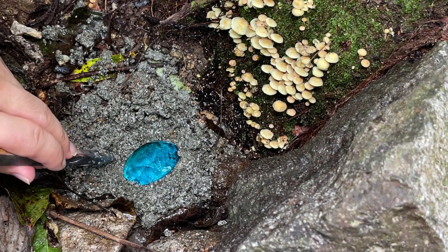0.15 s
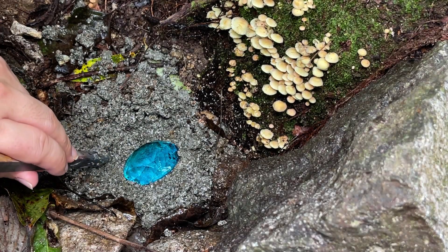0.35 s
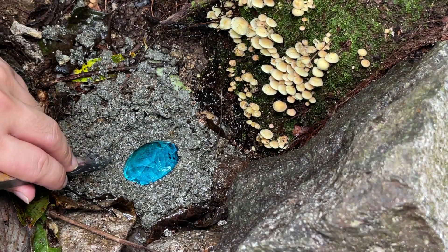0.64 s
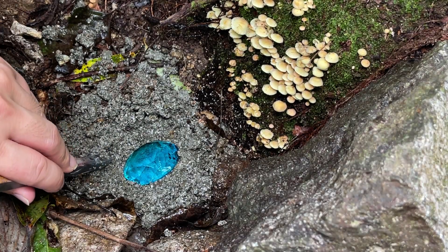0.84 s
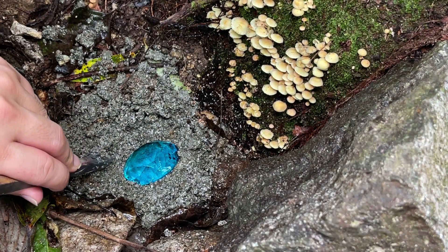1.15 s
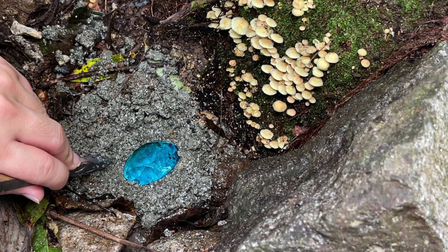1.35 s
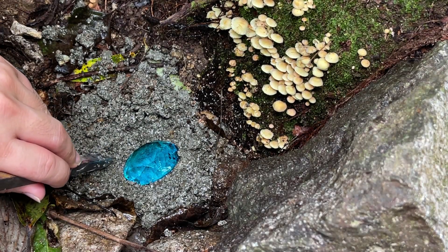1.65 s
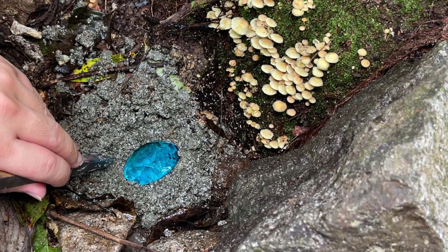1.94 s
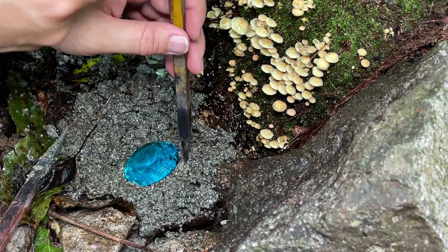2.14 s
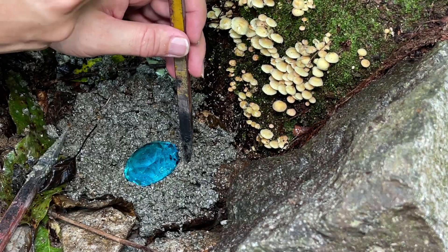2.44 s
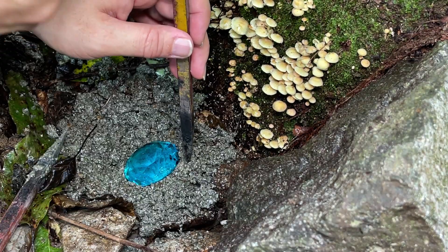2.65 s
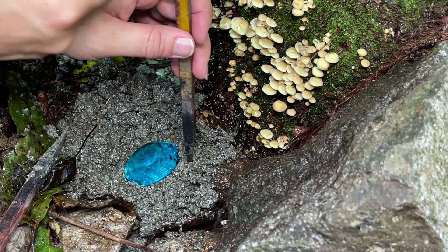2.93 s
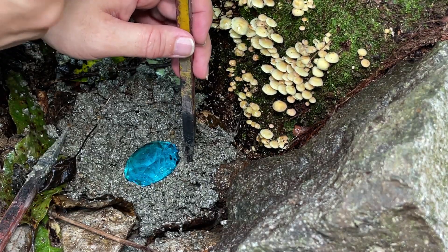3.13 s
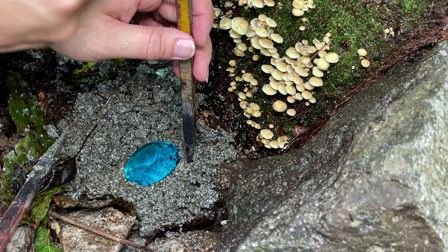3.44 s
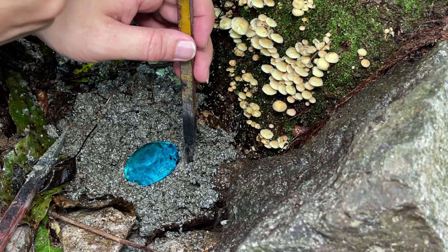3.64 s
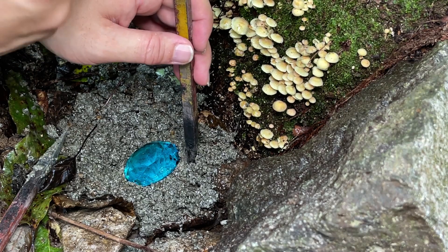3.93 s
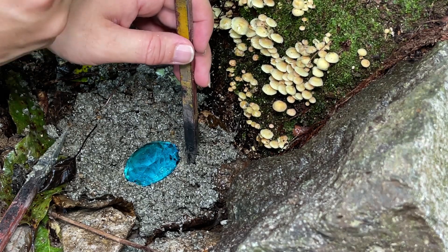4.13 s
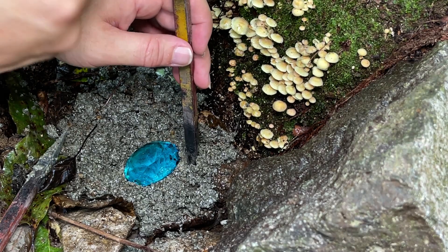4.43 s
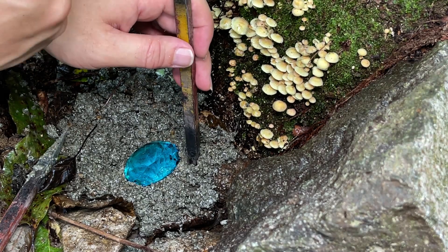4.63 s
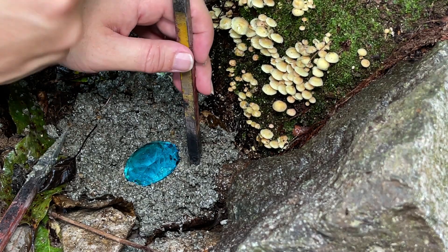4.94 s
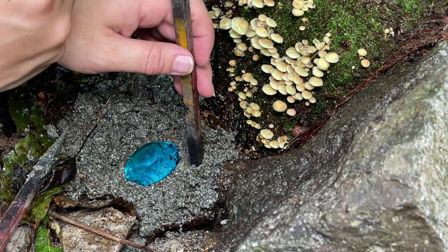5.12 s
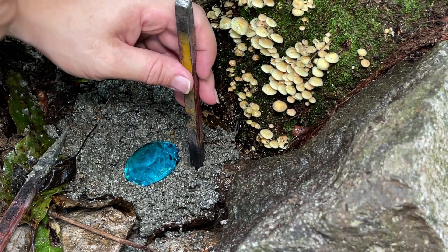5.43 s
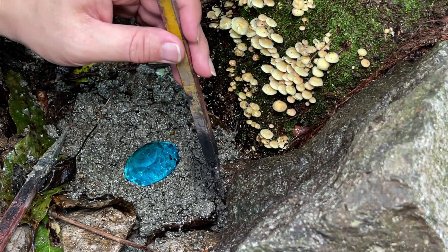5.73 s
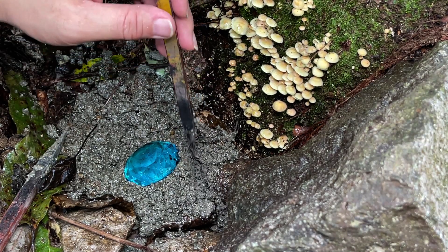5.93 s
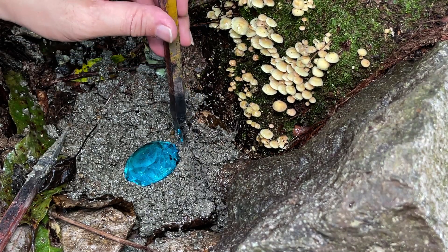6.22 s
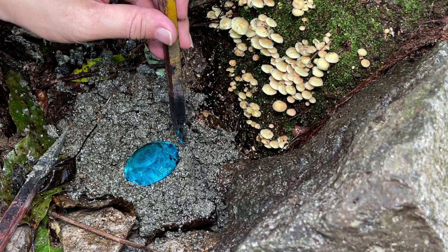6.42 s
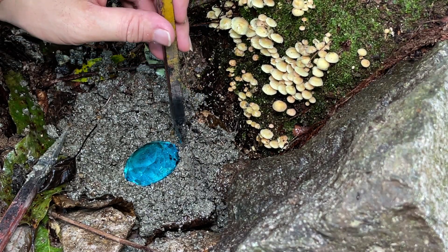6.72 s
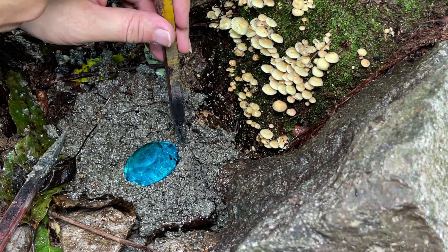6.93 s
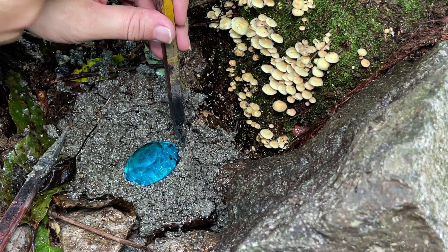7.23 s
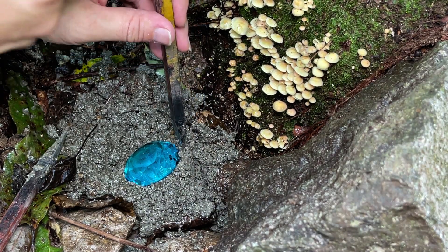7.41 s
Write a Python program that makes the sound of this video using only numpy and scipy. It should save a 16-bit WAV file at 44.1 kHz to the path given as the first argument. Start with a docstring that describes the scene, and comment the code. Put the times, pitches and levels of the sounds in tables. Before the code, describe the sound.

A steel pick chips crumbly rock close to a hand-held microphone, over a faint, steady hiss of far cicadas and forest air. A small bird chirps faintly at the start and near 1.6 seconds. From 1 second come five lighter taps, about four a second, each a sharp crack with a short clink, crushed grit and a slight thud. At 2.1 seconds the sound drops out for an instant. From 2.2 to 5.3 seconds the pick strikes harder at the same pace, with small rebounds, a little sliding grit and a faint echo from the trees. Near 2.8 seconds a bird whistles thinly and a distant dove starts cooing, both very quiet. From 5.5 to 6.5 seconds the tip scrapes softly over grit. A shrill insect, heard faintly at first, returns around 6.2 seconds. One soft tap at 7 seconds and two hard blows finish.

```python
"""Forest floor, hand-held microphone close to a steel pick chipping crumbly rock; cicadas far off throughout.
A small bird chirps, then the slanted pick strikes: each blow cracks, rings in the hand-damped steel,
crushes grit and thuds into the ground, and the trees answer faintly. At 2.1 s the sound drops out briefly.
The pick goes on upright and harder while a bird whistles and a far dove starts to coo. From 5.5 s the tip
drags over grit, a nearer insect swells for the second time, and three last blows fall."""
import sys
import numpy as np
from scipy import signal
from scipy.fft import rfft, irfft, next_fast_len
from scipy.io import wavfile
from scipy.ndimage import map_coordinates

SR = 44100
rng = np.random.default_rng(int(sys.argv[2]) if len(sys.argv) > 2 else 0)


def file_out(sig):
    """Save sig as 16-bit WAV at sys.argv[1]."""
    # one column per channel
    cols = np.atleast_2d(sig).T
    # limit, then scale
    lim = np.clip(cols, -1, 1)
    pcm = np.round(lim * 32767).astype(np.int16)
    wavfile.write(sys.argv[1], SR, pcm)


N = 333837
TIME = np.arange(N) / SR
BLOW_SAMPLES, CUTOFF_HZ = 8192, 16200
DROPOUT_S = (2.1005, 2.205)   # the pick is slanted before it, upright after

# Table levels are relative; a row's t is its start.
# blows, close up: t/s, strength/dB, grain sharpness/dB, ring of upper modes/dB, clink of main mode/dB
BLOWS = [(1.0114, 1, -2.5, 7.5, 11.5), (1.2527, 5.5, -6, 5, -3.5), (1.4848, 3.5, -3.5, 5.5, -8),
         (1.721, 3, 3, -0.5, -7.5), (1.9383, 5, -4, 4, -2.5), (2.2438, 14, -0.5, 0.5, -8),
         (2.511, 13, 1, 6.5, -2.5), (2.7904, 12.5, -2, 10.5, -3), (3.039, 2, -7, 2, -18.5),
         (3.2947, 15, -0.5, 3, -11), (3.5577, 14.5, -2.5, 6.5, -7), (3.8126, 12.5, -5, -2, -16),
         (4.0813, 19.5, 4, 3.5, -9), (4.3229, 20.5, 0, 1, -9.5), (4.5731, 21, 4, 1, -5.5),
         (4.8322, 21, -1.8, -0.5, -8), (5.0862, 15, -3, 1.5, 3.5), (5.3198, 15.5, -7.5, 5.5, 1.5),
         (7.011, -10, -10.5, 5.5, 3.5), (7.2478, 15, -1.5, 4.5, 2.5), (7.5271, 18.5, 2.5, -2, -10)]
# the tip falls back on the rock: t/s, strength/dB
REBOUNDS = [(1.2612, -10), (1.9436, -5.5), (2.2573, -4.5), (2.5328, -8.5), (2.7964, 0), (3.8187, 0.5),
            (4.0953, 4), (4.3313, -3), (4.5863, -2), (4.8431, 4), (7.2627, -11.5), (7.5393, -14)]
# crack of steel on rock in each grip: f/Hz, level/dB
CRACK_SLANTED = [(40, -30.5), (120, -8), (240, -20), (420, -5.5), (700, -8), (1500, -6.5), (2200, 4),
                 (3000, 2.5), (4500, -12), (6000, -15.5), (7500, -23), (10000, -20.5), (13000, -29.5),
                 (16000, -43)]
CRACK_UPRIGHT = [(40, -17.5), (120, -10), (240, -14.5), (390, -2), (620, -4.5), (1100, -3), (1700, 0.5),
                 (2800, -1), (4400, -13.5), (5500, -10), (7500, -24.5), (10000, -20), (13000, -32.5),
                 (16000, -39)]
TOP_SLANTED_HZ, TOP_UPRIGHT_HZ = 13300, 13620   # a high, clear ring of the steel
# resonances of pick and rock, negative where they cancel: f/Hz, width/Hz, gain/dB
MODES_SLANTED = [(370, 72, 2.4), (975, 61, -14), (1170, 160, 7.1), (1420, 140, -24.5), (2252, 340, 2.1),
                 (2510, 110, -18), (2400, 76, 0.93), (2400, 120, -16), (3300, 90, -16.5),
                 (4900, 250, -11.5), (4600, 250, 6.9), (4300, 160, -4.5), (5780, 147, 12), (6100, 90, 11.6),
                 (9500, 250, 7.5), (9700, 130, 9.3), (TOP_SLANTED_HZ, 45, 13)]
MODES_UPRIGHT = [(820, 210, -16), (1650, 120, 1), (2110, 260, 4.3), (2325, 200, -16.5), (2540, 190, 3),
                 (3170, 120, -8.5), (3343, 190, 4.95), (7000, 170, 2.2), (6200, 120, 2.8), (6340, 83, 10),
                 (6620, 110, 12), (11000, 230, 1.3), (10200, 130, 5.5), (TOP_UPRIGHT_HZ, 45, 18),
                 (14830, 65, 13)]
# main ring of the steel: f/Hz, level/dB, t60/s, lingering trace/dB
PING_SLANTED, PING_UPRIGHT = (3160, -33, 0.0356, -51.5), (3490, -25, 0.0161, -68)
# grit crushed under the tip: level/dB, t60/s
GRIT_SLANTED, GRIT_UPRIGHT = (-4, 0.025), (-7.5, .018)
# loose grit slides back into the hole: t/s, level/dB
SLIDES = [(4.75, -33.5), (5.005, -37)]
# spectra of sliding grit, tumbling crumbs, hollow ground and echo off the trees: f/Hz, level/dB
SLIDING_GRIT = [(500, -18.5), (1400, -3), (2500, -2), (3500, -7), (6000, -31.5)]
CRUMBS = [(40, -5), (90, 1.5), (170, 1.5), (250, -5), (400, 0), (650, 2), (850, -4.5), (1200, -3.5),
          (3000, -6), (6000, -17.5), (14000, -29)]
GROUND_BOOM = [(40, -10.5), (70, -3.5), (100, 3.5), (135, -9), (220, -3.5), (290, -22), (500, -24.5),
               (900, -35), (2000, -57.5)]
TREE_ECHO = [(200, -22.5), (800, -15), (1400, -7), (2300, 1.5), (3600, 1.5), (4200, -9.5), (6300, -7),
             (8000, -21), (10500, -14.5), (13000, -25), (16000, -27.5)]
# the tip drags over grit: t/s, length/s, ping f/Hz, level/dB
DRAGS = [(0.167, 0.025, 3200, -63.5), (5.5, 0.11, 3450, -74), (5.596, 0.12, 3340, -69.5),
         (5.752, 0.054, 2880, -76), (6.422, 0.066, 3450, -84), (6.495, .008, 3500, -83)]
# upper modes of the dragged tip: f/Hz, width/Hz, gain/dB
TIP_MODES = [(6550, 210, 17.5), (10250, 190, 13.5), (13500, 190, 10), (14900, 120, 12)]
# a small bird's chirps, another's thin rising whistle: t/s, length/s, start f/Hz, end f/Hz, level/dB
CHIRPS = [(.165, 0.051, 5000, 4300, -74), (1.58, .06, 7350, 6700, -68), (1.62, .07, 5470, 4980, -79.5)]
WHISTLE = [(2.8, 0.26, 4590, 4860, -81)]
# phrases of the far dove: t/s
COO_STARTS = [2.76, 4.6, 6.51]
# its three falling notes: delay/s, length/s, start f/Hz, end f/Hz, level/dB
COO_NOTES = [(0, .19, 476.3, 472, -80.5), (.52, .2, 402.5, 407, -81.5), (1.0, .32, 388, 381, -82.5)]
# bouts of the nearer insect: t/s, end/s, level/dB
SHRILL_BOUTS = [(-.5, 2.1, -76.5), (6.2, 7.6, -78.5)]
# its partials: multiple of the main pitch, level/dB
SHRILL_PARTIALS = [(.955, -7), (1, 2), (1.035, -9), (1.08, -2), (1.116, -11), (1.165, -8)]
# far chorus of cicadas: f/Hz, level/dB
CICADAS = [(3500, -35.5), (4450, -20.5), (5000, -28.5), (5200, -16.5), (5400, -2), (6050, 0), (6550, -5.5),
           (7000, -12.5), (7400, -23.5), (8400, -17.5), (9400, -22), (10200, -33)]
# forest air during each grip: f/Hz, level/dB
AIR_SLANTED = [(60, -0.5), (150, 4), (400, 3), (1000, -1.5), (3200, -2.5), (4000, -11), (9000, -5.5),
               (11000, -13.5), (15500, -20.5)]
AIR_UPRIGHT = [(60, 9), (150, 3), (300, 1), (600, -0.5), (1200, -6), (2500, -10), (4000, -10.5),
               (9000, -10.5), (11000, -15.5), (15500, -16.5)]
# handling rumble on the microphone: t/s, level/dB
HANDLING = [(0, -77.5), (1.3, -78.5), (4.3, -75), (6.0, -75), (6.9, -82.5), (7.57, -77)]
# its spectrum: f/Hz, level/dB
RUMBLE = [(20, -0.5), (45, -7), (80, -14.5), (130, -28.5), (300, -49.5)]


def pick(carry_db=4, rebound_clink_db=-3):
    """Close up: blows, duller rebounds, loose grit and the boom of the ground; the trees echo behind."""
    direct, outward, crumble, slide = np.zeros((4, N))
    for s, db, sharp_db, ring_db, clink_db in BLOWS:
        slanted = s < DROPOUT_S[0]
        # a light blow stays in the soft crust; a harder or clinking one has reached firm rock
        soft_db = 3.5 - 0.39 * db - 0.0945 * clink_db
        crumble_db = -12.5 + 0.3227 * db - 0.3245 * clink_db
        grit_db, grit_t60 = GRIT_SLANTED if slanted else GRIT_UPRIGHT
        add(direct, s, from_db(db) * strike(s, soft_db, sharp_db, ring_db, grit_db, grit_t60))
        add(direct, s, clink(s, db + clink_db))
        add(outward, s, from_db([db + (carry_db if slanted else 0)]))   # the slanted pick carries further
        add(crumble, s, from_db([crumble_db]))
    for s, db in REBOUNDS:
        tap = strike(s, soft_db=2.5, sharp_db=-8, ring_db=-5.5, grit_db=-2.5, grit_t60=0.024)
        add(direct, s, from_db(db) * tap)
        add(direct, s, clink(s, db + rebound_clink_db))
    for s, db in SLIDES:
        add(slide, s, from_db([db]))
    crumbs = from_db(-11.5) * scatter(crumble, CRUMBS, t60=.045, rise_s=0.001)
    ground = from_db(-22) * scatter(crumble, GROUND_BOOM, t60=0.42, rise_s=0.0058)
    trees = from_db(-46.5) * scatter(outward, TREE_ECHO, t60=0.4, rise_s=0.06)
    return direct + crumbs + ground + trees + scatter(slide, SLIDING_GRIT, t60=0.24, rise_s=.05)


def strike(s, soft_db, sharp_db, ring_db, grit_db, grit_t60, vary_db=0.47, soft_hz=1000, sharp_hz=4000):
    """One contact: an impulse, splinters and crushed grit, through the resonances of pick and rock."""
    hz = np.fft.rfftfreq(BLOW_SAMPLES, 1 / SR)
    crack, modes = (CRACK_SLANTED, MODES_SLANTED) if s < DROPOUT_S[0] else (CRACK_UPRIGHT, MODES_UPRIGHT)
    grit, splinters = fractures(grit_t60)
    bass = 1 / (1 + (hz / soft_hz) ** 4)
    treble = 1 - 1 / (1 + (hz / sharp_hz) ** 6)
    # in the treble the contact breaks up into many tiny fractures
    broken = from_db(15) * treble * hz / CUTOFF_HZ
    force = (1 + broken * splinters) / np.sqrt(1 + broken ** 2) + from_db(grit_db) * grit
    # a soft spot adds body, a hard grain adds edge
    colour_db = db_at(crack, hz) + soft_db * bass + sharp_db * treble
    # a loose hand lets the sharp modes sing
    centre, width, db = np.transpose(modes)
    mode_db = db + vary_db * rng.standard_normal(len(db)) + ring_db * np.clip(db / 15, 0, 1)
    spectrum = force * causal(colour_db) * resonances(zip(centre, width, mode_db), hz) * smear(hz)
    return irfft(spectrum) * np.linspace(1, 0, BLOW_SAMPLES) ** 2


def fractures(grit_t60, splinter_t60=.011, uneven_db=4.1):
    """Rock breaks under the tip: spectra of two dying bursts of uneven grains, grit and splinters."""
    shape = (2, BLOW_SAMPLES)
    grains = rng.standard_normal(shape) * from_db(uneven_db * rng.standard_normal(shape))
    decays = from_db(-60 * TIME[:BLOW_SAMPLES] / [[grit_t60], [splinter_t60]])
    return [rfft(burst / np.linalg.norm(burst)) for burst in grains * decays]


def smear(hz, centre_hz=3000, width_hz=2500):
    """The pitches arrive slightly apart, so the first sharp spike of each crack becomes a short swing."""
    detune, loss = centre_hz ** 2 - hz ** 2, 1j * hz * width_hz
    return (detune - loss) / (detune + loss)


def clink(s, db, linger_t60=0.68, beat_hz=45, twin_db=-6):
    """The main bending mode of the steel beats with its sideways twin and dies fast; a trace lingers."""
    hz, level_db, t60, linger_db = PING_SLANTED if s < DROPOUT_S[0] else PING_UPRIGHT
    hz *= 1 + 0.0033 * rng.standard_normal()   # the fingers shift the pitch from blow to blow
    t = TIME[:SR // 2]
    pair = np.sin(2 * np.pi * hz * t) - from_db(twin_db) * np.sin(2 * np.pi * (hz + beat_hz) * t)
    decay = from_db(-60 * t / t60) + from_db(linger_db - 60 * t / linger_t60)
    return -from_db(db + level_db) * pair * decay


def scatter(pushes, spectrum, t60, rise_s):
    """Diffuse sound around the pick: noise that swells and dies after every push."""
    t = TIME[:2 * SR]
    power = (from_db(-60 * t / t60) * (1 - np.exp(-t / rise_s))) ** 2
    energy = signal.fftconvolve(pushes ** 2, power / power.sum())[:N]
    return noise(spectrum) * np.sqrt(np.abs(energy))


def drags(grains_per_s=900, ping_width_hz=130, ping_db=25):
    """Close and quiet: grains catch on the sliding tip and keep it ringing."""
    out, size = np.zeros(N), 2 * BLOW_SAMPLES
    hz = np.fft.rfftfreq(size, 1 / SR)
    for s, length, ping_hz, db in DRAGS:
        stroke = np.sqrt(np.sin(np.pi * np.clip(TIME[:size] / length, 0, 1)))
        grains = rng.standard_normal(size) * (rng.random(size) < grains_per_s / SR) * stroke
        steel = resonances([(ping_hz, ping_width_hz, ping_db), *TIP_MODES], hz)
        scrape = irfft(rfft(grains) * steel) * np.linspace(1, 0, size)
        add(out, s, from_db(db) * rms_one(scrape) * np.sqrt(length * SR / size))
    return out


def bird(notes, blur_hz, blur_db, t60):
    """Gliding whistles, blurred and drawn out by the trees between bird and microphone."""
    out, t = np.zeros(N), TIME[:SR]
    for s, length, start_hz, end_hz, db in notes:
        phase = 2 * np.pi * np.cumsum(np.interp(t, [0, length], [start_hz, end_hz])) / SR
        paths = 1 + from_db(blur_db) * (drift(blur_hz, SR) + 1j * drift(blur_hz, SR))
        swell = np.minimum(t / (0.23 * length), 1) * from_db(-60 * np.maximum(t - length, 0) / t60)
        add(out, s, from_db(db) * swell * rms_one((paths * np.exp(1j * phase)).real))
    return out


def dove():
    """Far back in the trees, a dove repeats one phrase of low, nearly pure notes."""
    coos = [(s + delay, *note) for s in COO_STARTS for delay, *note in COO_NOTES]
    return from_db(-2) * bird(coos, blur_hz=21, blur_db=-12, t60=0.44)


def insects(chorus_db=-70, shrill_hz=7850, rasp_hz=210, swell_s=.55):
    """Far cicadas blur into a fluttering hiss; a nearer insect swells with rough, wandering partials."""
    chorus = from_db(chorus_db + drift(45)) * noise(CICADAS)
    pitch_hz = shrill_hz * (1 + 0.0038 * drift(4.4) + 0.0021 * drift(21))
    phase = 2 * np.pi * np.cumsum(pitch_hz) / SR
    rasp = drift(rasp_hz) + 1j * drift(rasp_hz)
    partials = sum(from_db(db) * (np.roll(rasp, rng.integers(N)) * np.exp(1j * ratio * phase)).real
                   for ratio, db in SHRILL_PARTIALS)
    bouts = sum(from_db(db) * np.clip((TIME - start) / swell_s, 0, 1) * (TIME < end)
                for start, end, db in SHRILL_BOUTS)
    return chorus + bouts * rms_one(partials)


def air(slanted_db=-75.5, upright_db=-77.5, sway_db=-48, rumble_db=5):
    """Forest hush and handling rumble; in the upright grip the hand sways the air at the microphone."""
    slanted = from_db(slanted_db) * noise(AIR_SLANTED)
    upright = from_db(upright_db) * noise(AIR_UPRIGHT) + from_db(sway_db) * drift(14)
    rumble = from_db(rumble_db + np.interp(TIME, *np.transpose(HANDLING))) * noise(RUMBLE)
    return np.where(TIME < DROPOUT_S[0], slanted, upright) + rumble


def resonances(modes, hz):
    """A chain of ringing peaks and cancelling dips."""
    response = 1
    for centre, width, db in modes:
        detune, loss = centre ** 2 - hz ** 2, 1j * hz * width
        response = response * (detune + from_db(db) * loss) / (detune + loss)
    return response


def causal(db):
    """The minimum-phase response with these gains: it sounds as early as it can."""
    cepstrum = irfft(np.log(from_db(db)))
    half = len(cepstrum) // 2
    cepstrum[1:half] *= 2
    cepstrum[half + 1:] = 0
    return np.exp(rfft(cepstrum))


def noise(spectrum):
    """Coloured noise of unit power."""
    n = next_fast_len(N, True)
    gain = from_db(db_at(spectrum, np.fft.rfftfreq(n, 1 / SR)))
    return rms_one(irfft(rfft(rng.standard_normal(n)) * gain, n)[:N])


def drift(rate_hz, size=N):
    """A smooth random wander of about unit spread."""
    knots = rng.standard_normal(4096)
    return map_coordinates(knots, [np.arange(size) / SR * rate_hz], order=2, mode="wrap")


def db_at(points, hz):
    """Read a spectrum on a log-frequency axis."""
    at, db = np.transpose(points)
    return np.interp(np.log(hz + 1e-9), np.log(at), db)


def from_db(db):
    """Decibels to gain."""
    return 10 ** (np.asarray(db) / 20)


def rms_one(x):
    """Scale to unit power."""
    return x / np.sqrt(np.mean(x ** 2) + 1e-20)


def add(out, s, sound):
    """Mix a sound in at s seconds."""
    i = max(0, round(s * SR))
    out[i:i + len(sound)] += sound[:max(0, N - i)]


def scene():
    """One microphone: pick in front, forest behind."""
    chirps = bird(CHIRPS, blur_hz=1210, blur_db=10.5, t60=0.58)
    whistle = bird(WHISTLE, blur_hz=400, blur_db=4, t60=.4)
    birds = chirps + whistle + dove()
    return (pick() + drags() + insects() + birds + air())[None]


def record(dry, ceiling=.72):
    """The hardest peaks are flattened, the sound drops out once, the top is cut."""
    live = (TIME < DROPOUT_S[0]) | (TIME > DROPOUT_S[1])
    limited = dry / (1 + (dry / ceiling) ** 4) ** .25
    lowpass = signal.ellip(10, .1, 80, CUTOFF_HZ, fs=SR, output="sos")
    return signal.sosfilt(lowpass, limited * live)


dry = scene()
out = record(dry)
file_out(out)
```